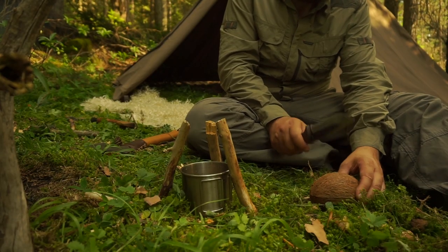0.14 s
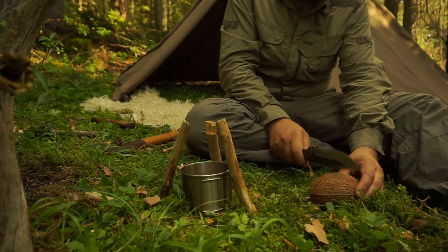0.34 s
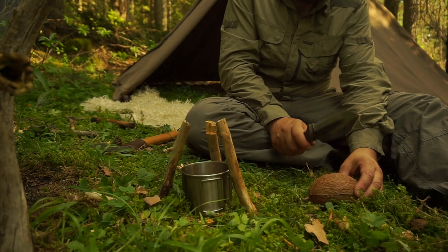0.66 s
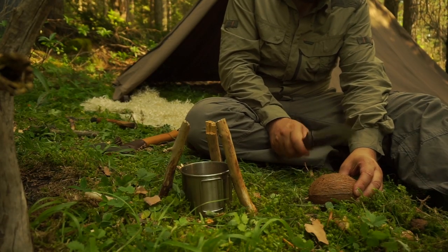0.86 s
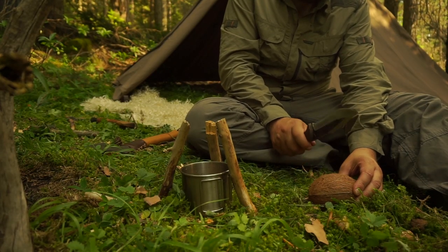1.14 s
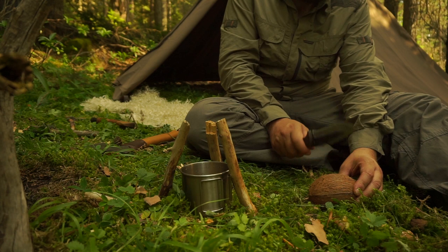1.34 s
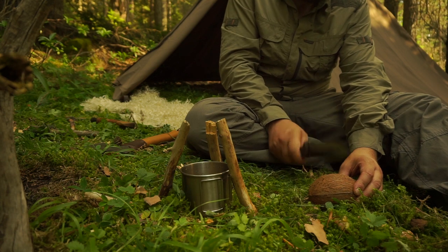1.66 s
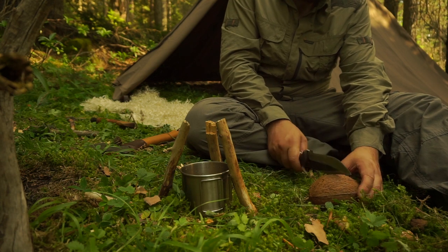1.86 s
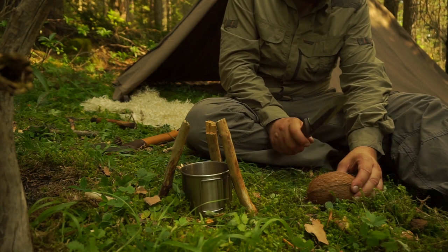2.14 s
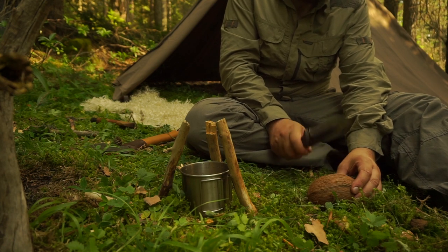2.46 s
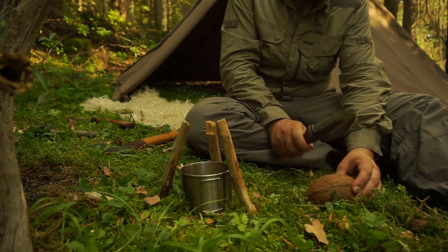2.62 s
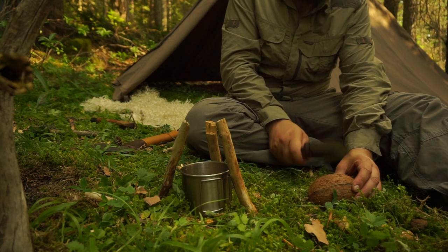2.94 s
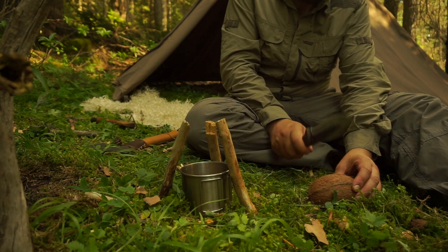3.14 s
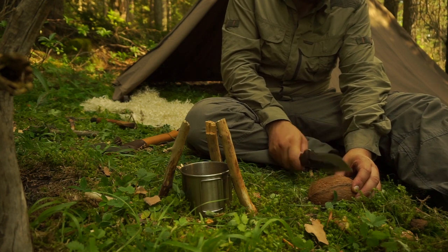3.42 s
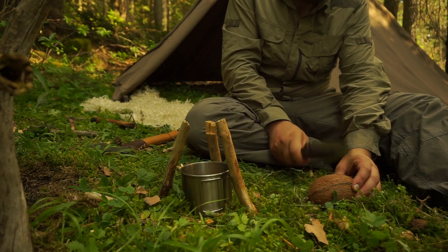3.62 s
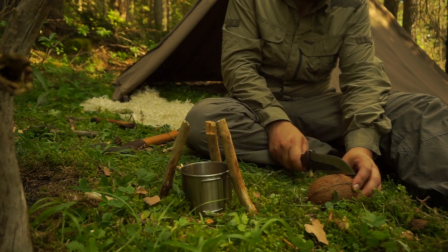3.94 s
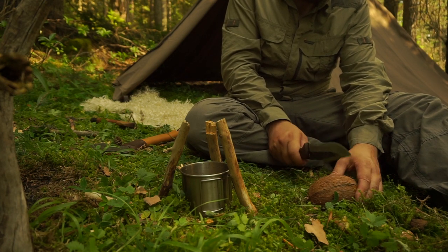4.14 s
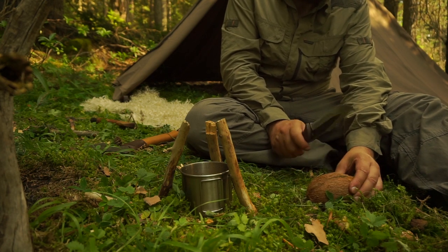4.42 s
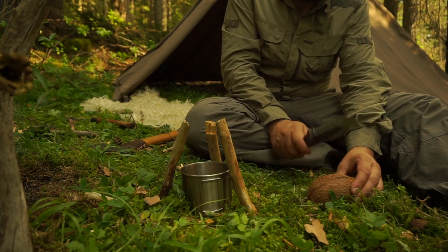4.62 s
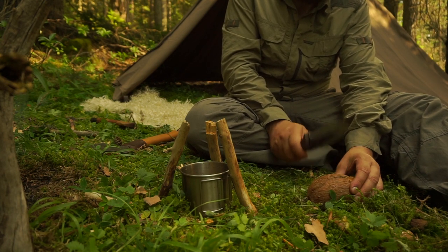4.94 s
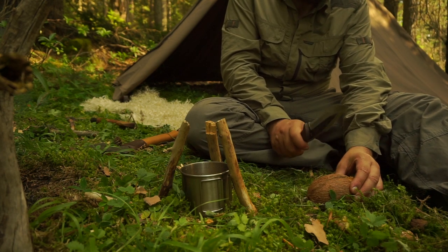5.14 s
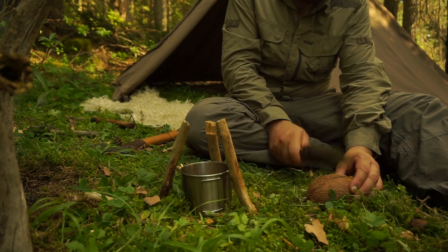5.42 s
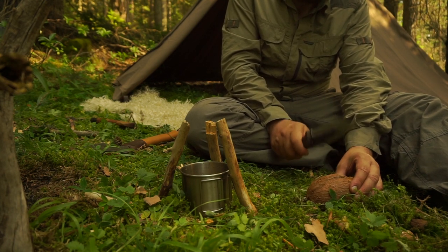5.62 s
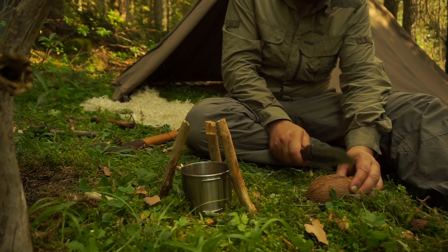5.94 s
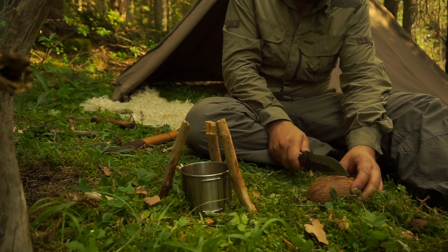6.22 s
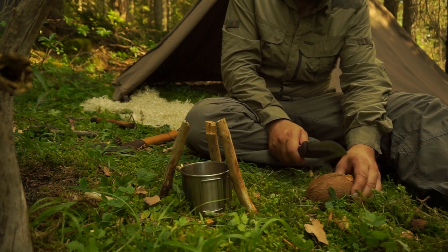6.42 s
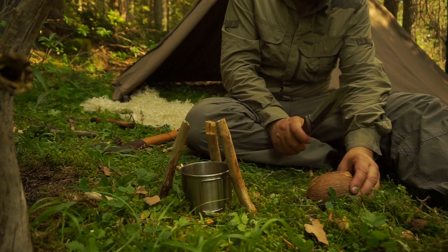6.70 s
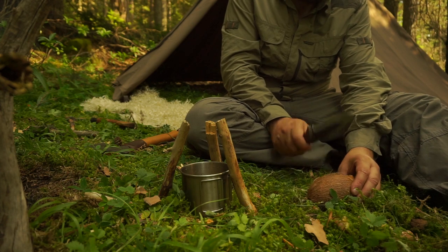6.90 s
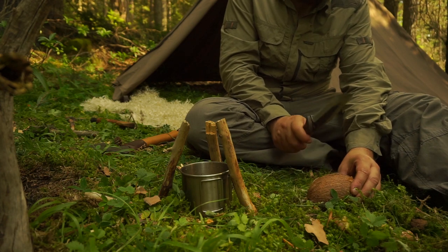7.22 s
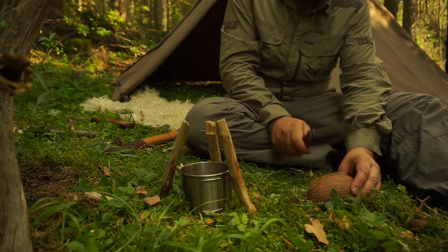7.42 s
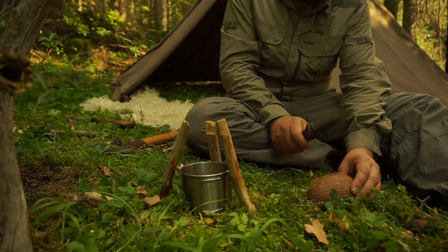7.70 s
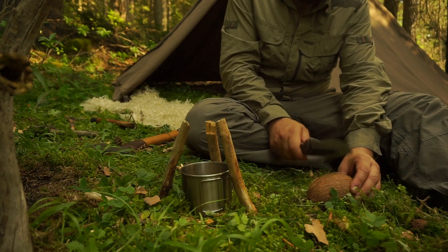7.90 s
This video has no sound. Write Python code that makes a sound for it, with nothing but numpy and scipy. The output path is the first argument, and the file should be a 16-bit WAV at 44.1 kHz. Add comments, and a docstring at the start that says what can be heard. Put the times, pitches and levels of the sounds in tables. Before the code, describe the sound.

In a quiet forest, steel strikes a hard coconut shell again and again, near the microphone on the right. Four runs of crisp, briefly ringing knocks are separated by short pauses with light cloth rustle, and in the final run the shell sounds a little split. Behind them a nearby songbird repeats a rising and falling whistle, then thin, far chirps, faint hoots and a few soft plinks sit in the steady air.

```python
"""A knife's spine knocks a coconut lying on moss, right of a stereo microphone, in a quiet forest.
Each blow rings the shell for milliseconds, some blows bounce, and the trunks answer late and softly.
The nut is turned between the four rounds of blows, and a sleeve rustles. One songbird whistles
near by, others far off; soft plinks and faint hoots sound over a steady rush of air."""
import sys
import numpy as np
from scipy import signal
from scipy.fft import rfft, irfft, next_fast_len
from scipy.io import wavfile
from scipy.ndimage import map_coordinates

SR = 44100
rng = np.random.default_rng(int(sys.argv[2]) if len(sys.argv) > 2 else 0)


def put_to_file(sound):
    """Save the sound as 16-bit audio at rate SR, in the file named by the first command-line argument."""
    columns = np.atleast_2d(sound).T  # one column per channel
    safe = np.clip(columns, -1, 1)
    whole_steps = np.round(safe * 32767)
    wavfile.write(sys.argv[1], SR, whole_steps.astype(np.int16))


N = 355446


def amp(db):
    """Gain of a level in dB."""
    return 10 ** (np.asarray(db) / 20)


def at_energy(db, x):
    """x scaled to a total energy in dB."""
    return amp(db) * x / np.linalg.norm(x)


def along(points, hz):
    """(Hz, value) points interpolated on a log axis."""
    knots_hz, values = np.transpose(points)
    return np.interp(np.log(hz + 1), np.log(knots_hz + 1), values)


def wobble(rate_hz, size):
    """Smooth random curve, rate_hz knots a second."""
    knots = rng.standard_normal(int(size * rate_hz / SR) + 4)
    return map_coordinates(knots, [np.arange(size) * rate_hz / SR])


def filtered(x, response):
    """x through a complex frequency response."""
    size = next_fast_len(x.shape[-1] + 8192)
    return irfft(rfft(x, size) * response(np.fft.rfftfreq(size, 1 / SR)), size)[..., :x.shape[-1]]


def add(track, start_s, sound):
    """Mix a sound into a track."""
    part = track[..., round(start_s * SR):][..., :sound.shape[-1]]
    part += sound[..., :part.shape[-1]]


def pan(lean_db):
    """Stereo gains for a left-minus-right level."""
    return amp(np.vstack([lean_db, -lean_db]) / 2)


def stereo_noise(spectrum, likeness):
    """Noise of rms 1 from (Hz, dB) and (Hz, left-right correlation) points."""
    def response(hz):
        angle = np.arccos(np.clip(along(likeness, hz), -1, 1)) / 2
        return amp(along(spectrum, hz)) * [np.cos(angle), np.sin(angle)]
    mid, side = filtered(rng.standard_normal((2, N)), response)
    noise = np.array([mid + side, mid - side])
    return noise / np.sqrt(np.mean(noise ** 2))


def ringing(modes, t, scatter_db=0):
    """Damped sines from (Hz, dB, t60 s) rows; neighbours swing in opposite senses."""
    return sum((-1) ** k * amp(db + scatter_db * rng.standard_normal() - 60 * t / t60_s)
               * np.sin(2 * np.pi * hz * t) for k, (hz, db, t60_s) in enumerate(modes))


# Shell modes, in groups driven together. Each row: frequency in Hz, level in the group in dB, t60 in s.
RING_MODES = [(1948.6, 0, 0.031)]
PARTNER_MODES = [(2245, 0, 0.036)]
THUD_MODES = [(404.5, -15.5, 0.018), (851, -0.5, 0.014), (1377, -3.5, 0.0051)]
KNOCK_MODES = [(2755, 3, 0.0066), (3045, 5, 0.0037)]
CLACK_MODES = [(3720, 0, .008)]
EDGE_MODES = [(4194, 0, 0.0086), (4724, -1.5, 0.0072), (5030, -12, 0.0094), (6100, -11, 0.0072)]
# The steel's snap. Each row: frequency in Hz, gain in dB.
SNAP_SPECTRUM = [(5000, -69), (6500, -4), (7600, -4.5), (9600, -5), (10900, -1)]
# The face struck in each round. Each row: partner, knock, clack, edge and snap energy in dB re the blow.
FACES = [(-11.5, 1, -16, -0.5, -3.5), (-12.5, 3.5, -11, -3, -0.5), (-8.5, 0, -8.5, -7.5, -3),
         (0, -7, -10, -6, -1.5)]


def coconut_shell(t, face, ring_db, sharp_db):
    """Steel snaps on the shell and drives its modes; face, ring and sharpness set their balance."""
    per_ring, per_sharp = np.array([[1, -0.79, 1, -0.68, -0.5], [-0.33, 0.72, 0.24, 0.87, 1.5]])
    levels_db = FACES[face] + ring_db * per_ring + sharp_db * per_sharp
    partner_db, knock_db, clack_db, edge_db, snap_db = levels_db
    # the two long modes build during contact, then the fingers choke them
    grip = (1 - np.exp(-t / .0005)) * amp(-60 * (t / .028) ** 2)
    shell = at_energy(ring_db, grip * ringing(RING_MODES, t))
    shell += at_energy(partner_db, grip * ringing(PARTNER_MODES, t))
    shell -= at_energy(1.0, ringing(THUD_MODES, t, scatter_db=1.66))
    shell += at_energy(knock_db, ringing(KNOCK_MODES, t))
    shell -= at_energy(clack_db, ringing(CLACK_MODES, t))
    shell -= at_energy(edge_db, ringing(EDGE_MODES, t, scatter_db=6.5))
    snap = filtered(rng.standard_normal(len(t)), lambda hz: amp(along(SNAP_SPECTRUM, hz)))
    return shell + at_energy(snap_db, amp(-60 * t / .009) * snap)


def moss_return(x, share=.2, delay_s=.00058):
    """The ground sends back a weak, late copy."""
    return share * np.pad(x, (round(delay_s * SR), 0))[:len(x)]


def soil_thump(t, db):
    """The soil answers dully under the nut."""
    return amp(db - 60 * t / 0.091) * np.sin(np.pi * t / t[-1]) * np.sin(2 * np.pi * 102 * t)


def close_scatter(x, t):
    """Hands, knees and grass reflect at once and blur the ring."""
    tail = rng.standard_normal((2, len(t))) * amp(-60 * t / .022)
    return signal.fftconvolve(x[None], tail / np.linalg.norm(tail[0]), axes=1)


# Decay of the forest's echo. Each row: frequency in Hz, t60 in s.
TRUNK_DECAY = [(200, 0.26), (1500, 0.82), (5000, 0.85), (10000, 0.92)]


def trunk_echoes(x, gap_s, swell_s, reach_s=0.26):
    """After a gap, echoes from ever more trunks swell and die, thinning out past reach_s."""
    hz, frame_s, bins = signal.stft(rng.standard_normal((2, SR // 2)), SR, nperseg=256)
    decay = amp(-60 * frame_s / along(TRUNK_DECAY, hz)[:, None])
    tail = signal.istft(bins * decay, SR, nperseg=256)[1]
    t = np.arange(tail.shape[1]) / SR
    swell = 1 - np.exp(-np.clip(t - gap_s, 0, None) / swell_s)
    tail = tail * swell / np.sqrt(1 + (t / reach_s) ** 6)
    return signal.fftconvolve(x[None], tail / np.linalg.norm(tail[0]), axes=1)


# Blows and bounces. Each row: start in s, relative level in dB, ring in dB re the blow, sharpness in dB.
BLOWS = [(0.0002, -33, -8, -30), (0.3522, -22, 1.5, 2), (0.6014, -21.5, 2.5, 2.5), (0.8354, -21, 0.5, 2.5),
         (1.0651, -22.5, 0, 5), (1.2933, -23, 1, 6), (1.5234, -22, -0.5, 3.5), (1.7473, -21, -2, 1),
         (1.777, -21, 3.5, -1), (1.8003, -22, -2, 0), (1.824, -32, -4, -11), (2.3169, -22, -1.5, 0),
         (2.5741, -22, 0.5, 2), (2.8007, -24.5, 2.5, 5.5), (3.0295, -20.5, -3, -5.5),
         (3.256, -21.5, -2, -3), (3.4861, -22, -1.5, -1), (3.7085, -22, -1.5, -1.5),
         (3.9289, -21.5, 2.5, 1.5), (3.955, -21.5, 1, -0.5), (3.9861, -33.5, -6, -24),
         (4.0147, -33, -11, -25), (4.5686, -23.5, 2, -3.5), (4.597, -24.5, 2.5, -7.5),
         (4.8126, -23.5, 5.5, 1.5), (5.0433, -23, 5, 1.5), (5.2754, -20, 2, -2.5), (5.5017, -23, 4, 0),
         (5.727, -21.5, 5.5, -0.5), (5.9472, -20.5, 4.5, -5), (5.972, -26, -6.5, -31),
         (6.168, -23.5, 6.5, 2.5), (6.188, -22.5, 1.5, -7), (6.2068, -26, 1.5, -5.5),
         (6.2232, -35.5, -6, -16), (6.845, -25.5, 2, 2.5), (6.8627, -37, -5, 1.5), (7.1267, -22, -4.5, -1),
         (7.1409, -38.5, -9, 2.5), (7.3855, -27, -6.5, 5), (7.3963, -30, -3, -9),
         (7.6354, -27.5, -3.5, 7.5), (7.6449, -27.5, -17, -26), (7.8919, -19, -6, -5),
         (7.9199, -43.5, -6, 0)]
# The nut's direct sound. Each row: frequency in Hz, left minus right in dB.
NUT_LEAN = [(60, -3.0), (120, -1.5), (220, 0.5), (430, -4.0), (830, -4.5), (1590, -14.5), (3060, -11.5),
            (5900, -7.5), (11400, -10.0)]
# What the nut radiates toward the trunks. Each row: frequency in Hz, gain in dB.
ECHO_COLOUR = [(300, -19), (700, -17), (1150, 6), (1550, 4), (1950, 9.5), (2250, 5), (2600, -15),
               (3100, -2), (3500, -2), (4000, -5), (4400, -4.5), (5100, 4), (5600, -4), (11000, -6)]


def knife_blows(pause_s=.4, bounce_s=.1, split_s=6.5, sink_db_per_s=9):
    """The knife knocks the nut in rounds; ground, nearby things and trunks answer each blow."""
    direct, ground = np.zeros((2, N))
    close, far = np.zeros((2, 2, N))
    t = np.arange(SR // 8) / SR
    low_cut = signal.butter(5, 296, "high", fs=SR, output="sos")  # so small a body radiates no bass
    face, last_s, round_start_s = 0, 0, 0
    for start_s, db, ring_db, sharp_db in BLOWS:
        if start_s - last_s > pause_s:
            face, round_start_s = face + 1, start_s
        is_bounce = start_s - last_s < bounce_s
        last_s = start_s
        shell = coconut_shell(t, face, ring_db, sharp_db)
        blow = signal.sosfilt(low_cut, amp(db + 14) * (shell + moss_return(shell)))
        attack = blow * amp(-60 * t / .007)
        close_db = -4 if start_s > split_s else -9  # a split shell rattles too
        add(direct, start_s, blow)
        add(close, start_s + .0006, amp(close_db) * close_scatter(attack, t))
        add(far, start_s, trunk_echoes(attack, gap_s=0.013, swell_s=0.018))
        # a round drives the nut into the moss; a bounce hardly pushes it down
        thump_db = db - 43 + sink_db_per_s * (start_s - round_start_s) - 9 * is_bounce
        add(ground, start_s, soil_thump(t, thump_db))
    left_lag = lambda hz: np.exp(np.outer([-1, 1], 1j * np.pi * hz * .00004))
    direct = filtered(direct, lambda hz: pan(along(NUT_LEAN, hz)) * left_lag(hz))
    echoes = amp(-11) * pan(-3.5) * filtered(far, lambda hz: amp(along(ECHO_COLOUR, hz)))
    return direct + pan(-17) * close + echoes + ground


# Forest air. Each row: frequency in Hz, relative density in dB.
AIR_SPECTRUM = [(18, -63), (30, -37), (146, -17.5), (257, -15), (291, -11.5), (477, -8), (596, -10),
                (745, -7), (1000, -5), (1110, -8.5), (2100, -12.5), (2620, -10), (3040, -14.5),
                (11000, -18.5), (14300, -28), (22000, -120)]
# Its width. Each row: frequency in Hz, left-right correlation.
AIR_LIKENESS = [(60, 0.99), (220, 0.42), (830, -0.012), (3060, 0.0058), (11400, -0.12)]


def forest_air():
    """A faint, wide rush whose level drifts slightly."""
    gain = amp(-60 + 0.69 * wobble(3.24, size=N))
    return gain * pan(-0.41) * stereo_noise(AIR_SPECTRUM, AIR_LIKENESS)


# Hollow plinks. Each row: start in s, level in dB, frequency in Hz, t60 in s.
PLINKS = [(.004, -36, 1008, 0.073), (0.04, -39.5, 990, 0.044), (0.117, -41, 990, 0.052),
          (1.156, -48, 1053, 0.076), (1.199, -47.5, 1017, 0.094), (6.41, -51, 210, 0.022),
          (7.953, -47.5, 240, 0.22)]


def plinks():
    """A soft onset and a short, hollow ring of two modes."""
    out, t = np.zeros(N), np.arange(SR // 8) / SR
    onset = (1 - np.exp(-t / 0.00081)) ** 2
    for start_s, db, hz, t60_s in PLINKS:
        add(out, start_s, amp(db) * onset * ringing([(hz, 0, t60_s), (.44 * hz, -12, t60_s)], t))
    return pan(-2.5) * out


def whistle(shape, waver_hz, waver_db, buzz):
    """An unsteady sine along (s, Hz, dB) rows; fast pitch jitter along (s, Hz) rows makes it hoarse."""
    knots_s, hz, db = np.transpose(shape)
    t = np.arange(round(knots_s[-1] * SR)) / SR
    pitch_hz = np.interp(t, knots_s, hz) + waver_hz * wobble(92.3, size=len(t))
    pitch_hz += np.interp(t, *np.transpose(buzz)) * wobble(700, size=len(t))
    level_db = np.interp(t, knots_s, db) + waver_db * wobble(76.4, size=len(t))
    fades = np.clip(np.minimum(t, knots_s[-1] - t) / 0.0058, 0, 1)
    return fades * amp(level_db) * np.sin(2 * np.pi * np.cumsum(pitch_hz) / SR)


def far_notes(notes, lean_db, waver_hz, waver_db, wet_db, buzz_hz):
    """Short notes that swell and fade among the trunks."""
    out = np.zeros((2, N))
    for start_s, length_s, first_hz, last_hz, db in notes:
        middle_hz = (first_hz + last_hz) / 2
        shape = [(0, first_hz, db - 8), (length_s / 2, middle_hz, db), (length_s, last_hz, db - 7)]
        note = whistle(shape, waver_hz, waver_db, buzz=[(0, buzz_hz)])
        add(out, start_s, pan(lean_db) * note)
        add(out, start_s, amp(wet_db) * trunk_echoes(note, gap_s=0.012, swell_s=0.0033))
    return out


# Hoots. Each row: start in s, length in s, first and last pitch in Hz, level in dB.
HOOTS = [(.02, 0.056, 453, 506, -58), (.68, .1, 470, 474, -70), (4.11, 0.08, 455, 483, -65),
         (6.3, 0.09, 1160, 1136, -58), (6.52, .12, 1166, 1154, -64.5), (6.97, 0.11, 1180, 1180, -61)]


def hoots():
    """Faint, low, nearly level notes from far off."""
    return far_notes(HOOTS, lean_db=-2, waver_hz=4.3, waver_db=3.5, wet_db=-0.5, buzz_hz=14)


# Sleeve rustles. Each row: middle in s, hold in s, level in dB.
RUSTLES = [(.2, 0.043, -55.5), (2.08, 0.08, -53.5), (4.3, 0.086, -53), (6.3, 0.099, -87),
           (6.48, 0.1, -54.5), (7.72, 0.13, -58)]
# Snapping folds. Each row: start in s, level in dB.
FOLD_SNAPS = [(0.12, -47), (0.142, -49), (0.172, -45), (0.19, -61), (0.238, -55), (0.258, -47)]
# Cloth hiss. Each row: frequency in Hz, relative density in dB.
CLOTH_SPECTRUM = [(150, -70), (600, -3), (2000, -7.5), (5000, -6), (8000, -5), (10500, 0)]


def sleeve(rise_db_per_s=46, fall_db_per_s=53):
    """Cloth hisses in grains, each rustle swelling, holding and fading; a few folds snap."""
    t, gain = np.arange(N) / SR, np.zeros(N)
    for middle_s, hold_s, db in RUSTLES:
        before_s = np.clip(middle_s - hold_s / 2 - t, 0, None)
        after_s = np.clip(t - middle_s - hold_s / 2, 0, None)
        gain += amp(db - rise_db_per_s * before_s - fall_db_per_s * after_s)
    gain *= amp(2.77 * wobble(150, size=N))  # grain
    for start_s, db in FOLD_SNAPS:
        add(gain, start_s, amp(db - 60 * t[:SR // 100] / 0.012))
    return pan(-8.5) * gain * stereo_noise(CLOTH_SPECTRUM, likeness=[(5000, -0.28)])


# The near bird's two note shapes. Each row: time into the note in s, pitch in Hz, relative level in dB.
RISE_SHAPE = [(0, 3100, -22), (.015, 4200, -6), (.03, 5100, 0), (.045, 5800, -8)]
FALL_SHAPE = [(0, 7000, -22), (.015, 6750, -13), (.05, 8300, -21), (.1, 7300, -17), (.135, 5600, -7),
              (.16, 5000, -2), (.195, 4500, 0), (.21, 4420, -3), (.23, 4450, -18)]
# Hoarse middle of the fall. Each row: time into the note in s, pitch jitter in Hz.
FALL_BUZZ = [(.02, -7), (.035, 700), (0.098, 302), (.125, 598), (0.146, 0)]
# Its song. Each row: start in s, level in dB, boost of the note's opening in dB.
RISE_NOTES = [(.655, -58, 6), (1.065, -58, 11), (1.48, -50, 10), (1.945, -43, 2)]
FALL_NOTES = [(.775, -52.5, 1), (1.18, -52.5, 3), (1.605, -50.5, 6), (2.06, -45.5, 0)]


def near_bird():
    """A quick rise, then a long falling whistle, four times."""
    out = np.zeros((2, N))
    for notes, shape, buzz in (RISE_NOTES, RISE_SHAPE, [(0, 0)]), (FALL_NOTES, FALL_SHAPE, FALL_BUZZ):
        knots_s, hz, shape_db = np.transpose(shape)
        opening = np.clip(1.5 - 2.5 * knots_s / knots_s[-1], 0, 1)
        for start_s, db, opening_db in notes:
            contour = np.transpose([knots_s, hz, shape_db + opening_db * opening])
            note = amp(db) * whistle(contour, waver_hz=40, waver_db=2.5, buzz=buzz)
            add(out, start_s, pan(-15) * note)
            add(out, start_s, amp(-4) * trunk_echoes(note, gap_s=0.001, swell_s=0.001))
    return out


# Far birds. Each row: start in s, length in s, first and last pitch in Hz, level in dB.
FAR_BIRD_NOTES = [(3.8, 0.085, 7700, 7600, -64), (3.8, 0.17, 6670, 6500, -65),
                  (3.99, 0.16, 6650, 6200, -63), (4.04, 0.081, 7450, 7400, -61),
                  (4.26, 0.069, 7330, 7200, -60), (4.23, 0.13, 6500, 5950, -63),
                  (4.48, 0.053, 5550, 5300, -63), (4.9, 0.11, 5570, 6100, -68),
                  (4.9, 0.088, 6200, 6400, -67), (4.86, 0.074, 5500, 5650, -70),
                  (5.1, 0.12, 5720, 6350, -63.5), (5.17, 0.063, 6600, 6900, -73),
                  (7.455, 0.12, 6800, 6700, -64), (7.48, .1, 7740, 7500, -68), (7.5, .1, 6150, 6350, -70),
                  (7.69, 0.067, 6900, 7100, -62), (7.69, .1, 5900, 5900, -66),
                  (7.86, 0.03, 6050, 6050, -60), (7.92, 0.077, 6730, 6780, -63.5),
                  (7.92, 0.068, 5550, 5520, -63.5)]


def far_birds():
    """Thin, high, wavering whistles from far off."""
    return far_notes(FAR_BIRD_NOTES, lean_db=-8, waver_hz=40, waver_db=4, wet_db=1, buzz_hz=60)


def scene():
    """The forest's background, with the knife and the other near sounds over it."""
    background = forest_air() + far_birds() + hoots()
    return background + knife_blows() + near_bird() + plinks() + sleeve()


def record(dry):
    """The treble drops off a step, slopes away, and ends at the band limit."""
    step_hz, top_hz = 11010, 14000

    def response(hz):
        above_hz = np.clip(hz - step_hz, 0, None)
        return (hz < top_hz) * amp(-24 * np.minimum(above_hz / 200, 1) - 0.01 * above_hz)
    return filtered(dry, response)


dry = scene()
out = record(dry)
put_to_file(out)
```